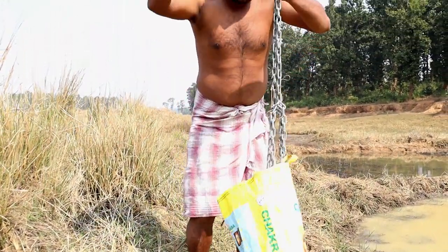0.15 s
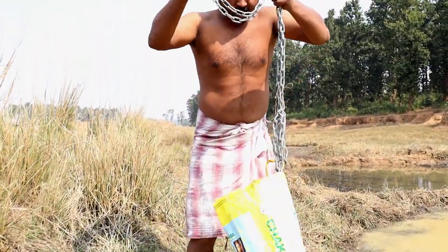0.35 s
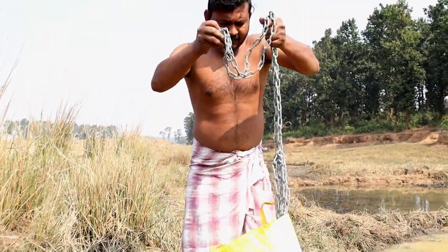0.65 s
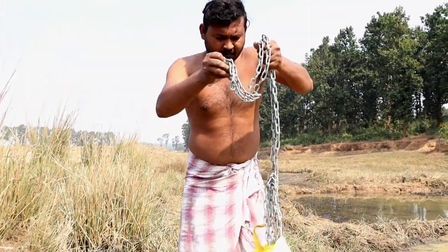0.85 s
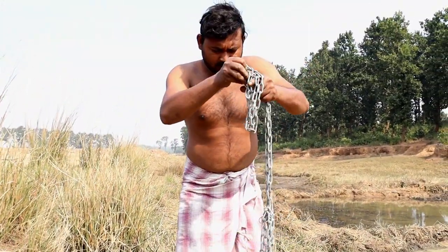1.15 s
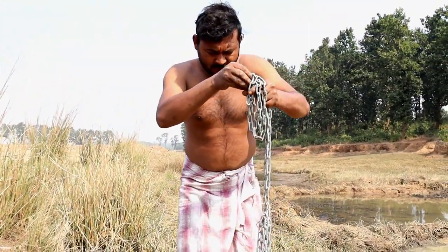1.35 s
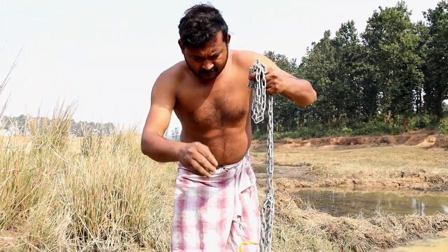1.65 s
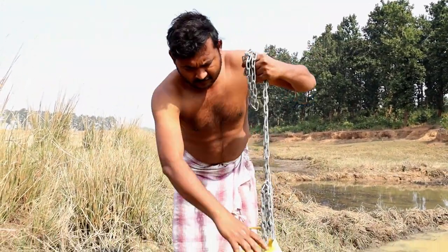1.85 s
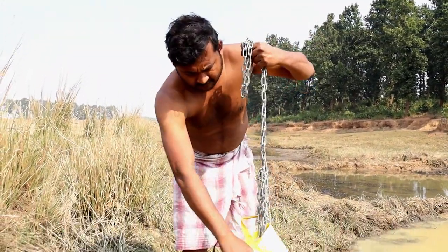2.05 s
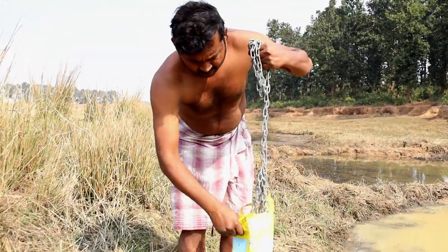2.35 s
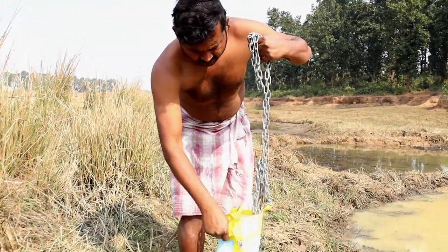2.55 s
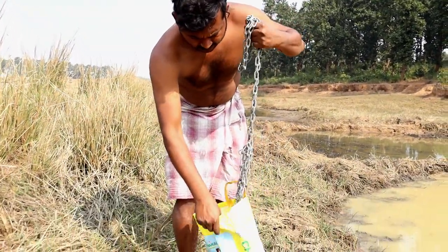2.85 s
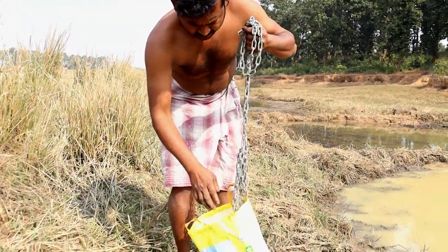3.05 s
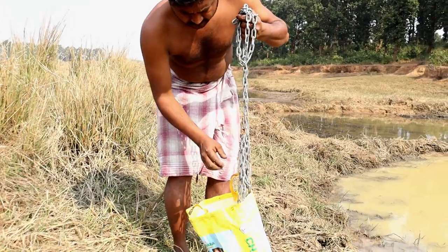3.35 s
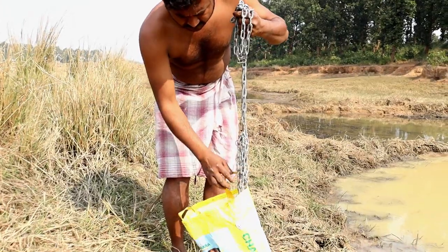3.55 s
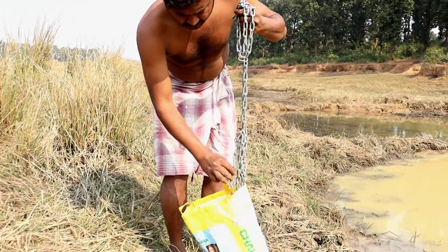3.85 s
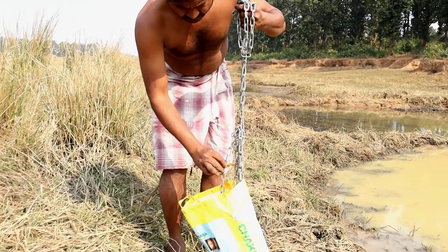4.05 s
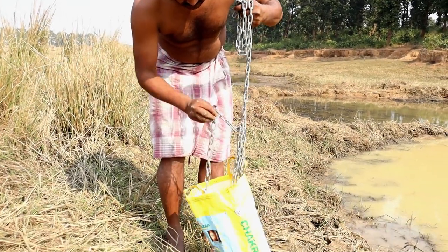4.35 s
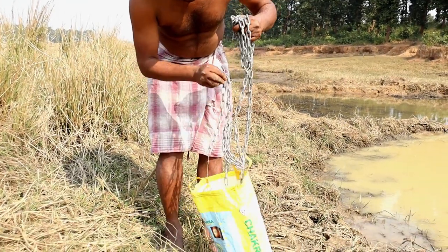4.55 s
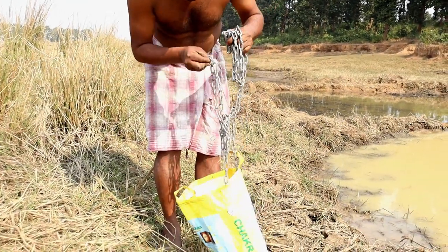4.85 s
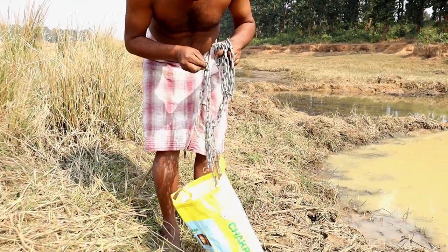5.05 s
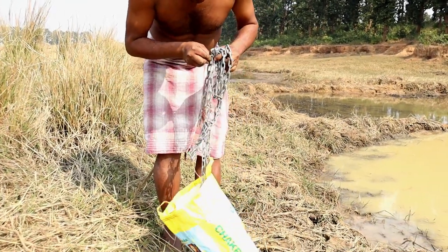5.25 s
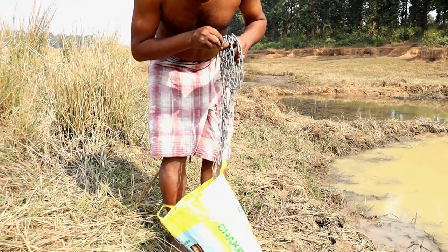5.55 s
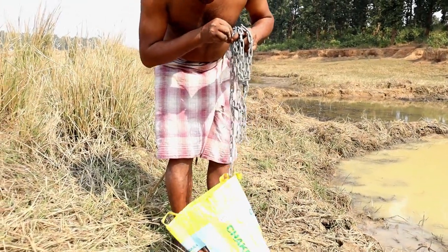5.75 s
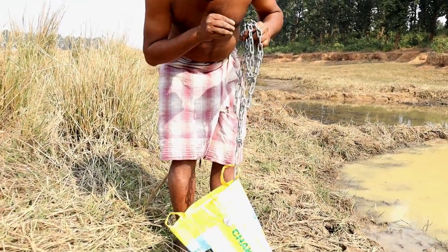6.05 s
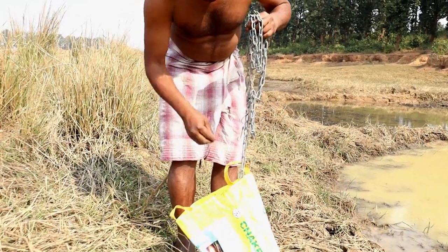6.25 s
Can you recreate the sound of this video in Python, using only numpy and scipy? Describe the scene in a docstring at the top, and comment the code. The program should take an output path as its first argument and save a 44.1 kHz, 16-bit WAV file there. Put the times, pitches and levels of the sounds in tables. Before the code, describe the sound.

A steel chain clinks and rings very high while a stiff woven plastic sack crackles and crumples, with faint low wind buffets outdoors.

```python
"""Beside a pond, a hand-gathered steel chain ticks and rings very high as a woven plastic sack snaps below it.
First come sharp creases, then clashing links; near 1.5 s the chain hisses through the fist amid low wind buffets.
The sack crumples hardest from 2 to 2.8 s, links clash densely from 4.6 to 5.7 s, and creases close the scene.
Links are struck decaying modes, creases and ticks are noise bursts, and wind is shaped low noise.
The left microphone is bright; the right hears chain, sack and air muffled and a moment later."""
import sys
import numpy as np
from scipy import signal
from scipy.fft import rfft, irfft, next_fast_len
from scipy.io import wavfile
from scipy.ndimage import uniform_filter1d

SR = 44100
rng = np.random.default_rng(int(sys.argv[2]) if len(sys.argv) > 2 else 0)


def transcribe(u):
    """Save the signal u as a 16-bit wav file named by the first command-line argument.

    u: samples, shape (n,) or (channels, n), limited to [-1, 1]; the rate is SR.
    q: integer samples, one column per channel.
    """
    v = np.clip(np.atleast_2d(u).T, -1, 1)
    q = np.round(v * 32767).astype(np.int16)
    wavfile.write(sys.argv[1], SR, q)


N = 282229
TIME = np.arange(N) / SR

# gusts swelling and fading at the microphones: middle_s, half_length_s, left_relative_db, right_relative_db
GUSTS = [(0.144, 0.13, -46, -47), (0.683, 0.14, -42, -46), (1.507, 0.32, -41.5, -36.5),
         (2.26, 0.53, -41.5, -34.5), (4.05, 0.49, -47, -38), (4.628, 0.096, -32.5, -49.5),
         (5.387, 0.096, -35.5, -46), (5.614, 0.057, -37.5, -49)]
# steady breeze under the gusts, left then right microphone: relative_db
BREEZE_DB = [-50.5, -46.5]
# spectrum of the wind's rumble: frequency_hz, gain_db
RUMBLE_SPECTRUM = [(20, -23.5), (50, -2), (120, 1), (310, -10), (550, -23), (1500, -48)]
# low buffets on the left microphone: start_s, swell_peak_db, nominal_hz
BUFFETS = [(.378, -20.5, 121), (.783, -23, 119), (1.487, -15.5, 220), (1.499, -11.5, 138.7),
           (1.528, -15.5, 166), (1.962, -6, 175), (2.855, -22, 109.5), (3.904, -10, 163),
           (5.215, -15.5, 77), (5.24, -13, 136)]
# dull handling bumps on the right microphone: start_s, relative_peak_db, resonance_hz
BUMPS = [(0.782, -37, 456), (3.091, -29.5, 380), (6.226, -36, 350), (6.349, -30, 420)]
# spectrum of the open-air hush: frequency_hz, gain_db
AIR_SPECTRUM = [(100, -2), (1300, 5.5), (3500, -4), (16000, -20)]
# the sack is tugged or squeezed, then relaxes: start_s, length_s, relative_db, settling_db_per_s
SQUEEZES = [(.04, 0.076, -42, 196), (.13, 0.14, -36.5, 227), (.94, 0.32, -51.5, 39.5),
            (2.07, 0.032, -37.5, 45), (2.34, .4, -37.5, 50), (3.1, 1.24, -57.5, 100), (4.43, 0.2, -49, 43),
            (5.36, 0.57, -47.5, 102), (5.74, 0.073, -35.5, 120.5), (5.895, 0.02, -29.5, 620),
            (6.35, 0.014, -44.5, 398.5)]
# the loudest creases snapping through: start_s, relative_peak_db, resonance_hz
SNAPS = [(0.037, -27.5, 1180), (0.058, -25, 346), (0.126, -22, 1130), (0.161, -20.5, 1310),
         (0.204, -21.5, 690), (0.216, -22.5, 710), (0.254, -19, 1140), (0.274, -24, 394),
         (0.68, -37.5, 1090), (0.941, -31, 620), (1.212, -33.5, 750), (1.278, -33, 1080),
         (2.05, -27.5, 700), (2.113, -23.5, 635), (2.139, -18, 1252), (2.211, -23.5, 1820),
         (2.305, -22, 635), (2.331, -20.5, 2200), (2.359, -23.5, 1180), (2.541, -13.5, 1080),
         (2.55, -15.5, 1210), (2.56, -16.5, 590), (2.656, -18, 1180), (2.723, -22.5, 1120),
         (2.745, -21, 1245), (3.079, -30.5, 680), (3.817, -36.5, 1226), (4.081, -37, 1270),
         (4.331, -35.5, 1300), (4.811, -33, 1207), (5.604, -34, 2270), (5.766, -24, 2730),
         (5.833, -24, 720), (5.886, -20.5, 1038), (5.905, -17.5, 660), (5.97, -32, 1020),
         (6.078, -37, 2180), (6.368, -31, 1589)]
# response of the sack's sheet: frequency_hz, gain_db
SHEET_SPECTRUM = [(60, -9.5), (200, 3), (370, 4), (540, -2), (1130, 2), (1500, -1.5), (2700, -7.5),
                  (3100, -11), (4800, -11.5), (7500, -21), (16000, -20.5)]
# the hands move the chain, then it swings out: start_s, length_s, relative_db, settling_db_per_s
PULLS = [(0.02, 0.073, -27, 331), (.175, .095, -28, 220), (.455, 0.036, -45.5, 550),
         (.63, 0.067, -37.5, 111), (.76, 0.17, -38, 100), (.928, 0.042, -29.5, 52),
         (2.045, 0.065, -42.5, 152), (2.26, 0.073, -38, 100), (2.34, 0.49, -34.5, 54.5),
         (3.485, 0.032, -42.5, 126), (3.63, 0.033, -37.5, 371), (3.805, 0.16, -43.5, 173),
         (4.43, 0.06, -46, 96), (4.5, 0.17, -30.5, 201), (4.745, 0.3, -34, 197), (5.18, 0.064, -32, 90),
         (5.365, 0.1, -25.5, 174), (5.565, .185, -33.5, 100), (5.77, .16, -30, 186.5),
         (6.245, 0.026, -49, 404.5)]
# the loudest clashes of links: start_s, ring_relative_db, crack_relative_db
CLINKS = [(0.6667, -21, -52), (0.7234, -28, -42.5), (1.0144, -24, -33.5), (1.1392, -24, -45),
          (1.2458, -38, -43), (2.5432, -18, -35), (2.656, -37, -29), (3.017, -41.5, -42),
          (3.0255, -27, -42), (3.053, -29, -42.5), (3.2134, -38, -40), (3.2416, -35, -36),
          (3.4963, -24, -33), (3.5158, -16.5, -31.5), (3.8189, -30, -42), (4.6415, -19, -35.5),
          (4.7375, -20, -41), (4.751, -19, -36.5), (4.756, -15, -48.5), (4.8185, -23, -39.5),
          (4.9395, -27, -53), (5.0405, -22, -42), (5.056, -20, -45), (5.1858, -25.5, -47),
          (5.359, -28.5, -33), (5.4666, -24, -34.5), (5.563, -27.5, -44), (5.7105, -18, -40)]
# typical modes of one link: ratio_to_pitch, level_db, t60_s
LINK_MODES = [(.425, -26, .06), (.712, -17, .06), (.86, -24, .06), (1, 0, .06), (1.003, -19, .2),
              (1.018, -6, .035), (1.105, -10, .03)]
# nominal pitches of the links: pitch_hz
LINK_HZ = [13100, 13400, 13650, 13780, 13860, 14080]
# spectrum of steel striking steel: frequency_hz, gain_db
TICK_SPECTRUM = [(300, -1), (1100, 1), (3000, -7), (5000, -3), (10000, -0.5), (12000, -3), (14000, 5),
                 (16000, -8.5)]
# muffling of the right microphone: frequency_hz, gain_db
RIGHT_MIC = [(500, 1.5), (950, -9.5), (1650, -16.5), (2200, -9), (4300, -17), (6000, -31), (14000, -47)]

AIR_DB, RIGHT_AIR_DB = -54.5, -58.0
SQUEEZE_RISE_DB_PER_S, SACK_REST_DB = 370, -62   # how fast it buckles; its faint rustle while it dangles
PULL_RISE_DB_PER_S, HANGING_DB = 735, -73   # how fast the links get going; their state when just hanging
CRACK_LOW_HZ = 1760   # the hardest clashes are too brief to carry much below this
GROUND_ECHO_S, GROUND_ECHO_DB = 0.001784, -11.5
RIGHT_LAG_S = .00036
CUTOFF_HZ = 15850


def from_db(db):
    """Decibel law: amplitude gain is ten to the power db / 20."""
    return 10 ** (np.asarray(db) / 20)


def rms_one(x):
    """Normalisation: scale to unit root-mean-square level."""
    return x / np.sqrt(np.mean(x ** 2) + 1e-20)


def add(track, s, sound):
    """Superposition: mix a short sound in at time s."""
    at = int(np.clip(s * SR, 0, N - 1))
    track[at:at + len(sound)] += sound[:N - at]


def delayed(x, s):
    """Propagation delay: the same sound arrives s seconds later."""
    return np.interp(TIME - s, TIME, x)


def drift(rate):
    """Slow random modulation: joined random values, rate per second, with unit rms."""
    return rms_one(np.interp(TIME * rate, np.arange(4096), rng.standard_normal(4096)))


def high_pass(x, hz):
    """First-order high-pass filtering: weaken what lies below hz."""
    return signal.sosfilt(signal.butter(1, hz, "high", fs=SR, output="sos"), x)


def spectrum_gain(spectrum):
    """Frequency response: interpolate decibels along log frequency; return FFT size and gains."""
    size = 2 * next_fast_len(N // 2 + 4096)
    hz, db = np.transpose(spectrum)
    bins = np.maximum(np.arange(size // 2 + 1) * SR / size, 1)
    return size, from_db(np.interp(np.log(bins), np.log(hz), db))


def colour(x, spectrum):
    """Minimum-phase filtering: a folded cepstrum gives the spectrum a causal response."""
    size, gain = spectrum_gain(spectrum)
    cepstrum = irfft(np.log(gain))
    cepstrum[1:size // 2] *= 2
    cepstrum[size // 2 + 1:] = 0
    return irfft(rfft(x, size) * np.exp(rfft(cepstrum)))[:N]


def muffled(x, spectrum):
    """Zero-phase filtering: weaken or lift each frequency without delaying it."""
    size, gain = spectrum_gain(spectrum)
    return irfft(rfft(x, size) * gain)[:N]


def ring(clicks, hz, t60):
    """Damped resonance: a unit click starts a decaying sine of nominal height 1."""
    radius = from_db(-60 / (t60 * SR))
    angle = 2 * np.pi * hz / SR
    feedback = [1, -2 * radius * np.cos(angle), radius * radius]
    return signal.lfilter([0, np.sin(angle)], feedback, clicks + 1e-18)


def dying_noise(t60, size=2048):
    """Exponential decay: a dying noise burst with unit energy."""
    burst = rng.standard_normal(size) * from_db(-60 * TIME[:size] / t60)
    return burst / np.linalg.norm(burst)


def contacts(per_s, spread_db):
    """Random impacts: clicks at chance times, many weak and a few strong, of either sign."""
    strength_db = spread_db * np.minimum(rng.exponential(1, N), 3.5)
    sizes = from_db(strength_db) * rng.choice([-1, 1], N)
    return sizes * (rng.random(N) < per_s / SR)


def evened(x, span):
    """Level equalisation: even out power over span seconds, keeping the finer grain."""
    power = uniform_filter1d(x ** 2, max(int(span * SR), 1))
    floor = 0.0034 * np.mean(x ** 2)   # keeps the quietest parts from being lifted fully
    return x / np.sqrt(np.maximum(power, 0) + floor)


def movement(rows, rise_db_per_s, rest_db):
    """Addition of powers: movements rise, hold and settle over a resting level, in dB."""
    power = from_db(rest_db) ** 2
    for start_s, length_s, level_db, settling_db_per_s in rows:
        early = np.maximum(start_s - TIME, 0)
        late = np.maximum(TIME - start_s - length_s, 0)
        drop_db = np.minimum(rise_db_per_s * early + settling_db_per_s * late, 120)
        power = power + from_db(level_db - drop_db) ** 2
    return 10 * np.log10(power)


def crackle(clicks, t60, low_lingers, patchy_db):
    """Frequency-dependent damping: clicks feed decaying noise bands; t60 holds at 1 kHz, lows last longer."""
    out = np.zeros(N)
    edges = np.geomspace(90, 17000, 12)
    at = np.flatnonzero(clicks)
    for low, high in zip(edges, edges[1:]):
        # each click draws its own level in each band, hence its own colour
        patch = np.clip(rng.standard_normal(len(at)), -2, 1)
        energy = np.zeros(N)
        energy[at] = (clicks[at] * from_db(patchy_db * patch)) ** 2
        band_t60 = t60 * (np.sqrt(low * high) / 1000) ** -low_lingers
        keep = from_db(-120 / (SR * band_t60))   # energy falls as amplitude squared
        stored = signal.lfilter([1 - keep], [1, -keep], energy + 1e-18)
        noise = np.sqrt(stored) * rng.standard_normal(N)
        out += signal.sosfilt(signal.butter(2, [low, high], "band", fs=SR, output="sos"), noise)
    return out


def knocks(rows, level_db, t60, width_hz):
    """Broad resonance: a dying scuff excites each short dull knock."""
    out = np.zeros(N)
    for start_s, peak_db, resonance_hz in rows:
        knock = ring(dying_noise(t60), resonance_hz, 2.2 / width_hz)   # bandwidth to decay time
        add(out, start_s, from_db(peak_db + level_db) * knock / np.abs(knock).max())
    return out


def air_hush(level_db):
    """Stationary broadband noise: an open-air hush."""
    return from_db(level_db) * rms_one(colour(rng.standard_normal(N), AIR_SPECTRUM))


def wind(level_db, lumpy_db):
    """Turbulence: gust and breeze powers add, with independent eddies at each microphone."""
    power = from_db(BREEZE_DB)[:, None] ** 2
    for middle_s, half_length_s, left_db, right_db in GUSTS:
        swell = np.exp(-((TIME - middle_s) / half_length_s) ** 2)
        power = power + from_db([[left_db], [right_db]]) ** 2 * swell
    microphones = []
    for mic_power in power:
        eddies = from_db(level_db + lumpy_db * np.tanh(drift(30)))
        rumble = rms_one(colour(rng.standard_normal(N), RUMBLE_SPECTRUM))
        microphones.append(np.sqrt(mic_power) * eddies * rumble)
    return np.array(microphones)


def buffets(cycles, sag, size=4000):
    """Damped oscillation: each push on the microphone swings to and fro, slowing as it dies."""
    out = np.zeros(N)
    for start_s, peak_db, nominal_hz in BUFFETS:
        turns = TIME[:size] * nominal_hz
        swell = turns / cycles * np.exp(1 - turns / cycles)
        swing = np.sin(2 * np.pi * 1.45 * np.log1p(sag * turns) / sag)   # starts at 1.45 times nominal_hz
        add(out, start_s, from_db(peak_db) * swell * swing)
    return out


def sack(crinkle_db, snap_db, per_s, spread_db):
    """Buckling: the stiff sheet releases countless small creases and a few loud snaps."""
    crumple_db = movement(SQUEEZES, SQUEEZE_RISE_DB_PER_S, SACK_REST_DB)
    crease_rate = per_s * from_db(.3 * (crumple_db + 36.5))
    creases = evened(contacts(crease_rate, spread_db), span=0.076)
    creases = from_db(crumple_db + crinkle_db) * creases
    snaps = np.zeros(N)
    for start_s, peak_db, _ in SNAPS:
        add(snaps, start_s, from_db([peak_db + snap_db]))
    # a small crease has a colour of its own; a big snap shakes the whole sheet and rings briefly at its own
    # pitch
    crinkle = crackle(creases, t60=.052, low_lingers=.25, patchy_db=4.5)
    snapping = crackle(snaps, t60=.045, low_lingers=.35, patchy_db=2)
    sheet = colour(crinkle + snapping, SHEET_SPECTRUM)
    return sheet + knocks(SNAPS, level_db=0.5, t60=.025, width_hz=160)


def slide(middle_s, half_length_s, level_db):
    """Friction noise: the chain slips through the fist with a short soft hiss."""
    swell = np.exp(-((TIME - middle_s) / half_length_s) ** 2)
    return from_db(level_db) * swell * rms_one(colour(rng.standard_normal(N), TICK_SPECTRUM))


def slack(depth, length_s, size=4000):
    """Free fall: just before a clash the links hardly touch, so the jostling weakens."""
    falling = np.zeros(N)
    for start_s, *_ in CLINKS:
        add(falling, start_s - size / SR, np.exp(-TIME[:size][::-1] / length_s))
    return 1 - depth * np.minimum(falling, 1)


def link(clicks, hz):
    """Modal superposition: a link rings in all its modes, and no two are bent quite alike."""
    out = 0
    for ratio, level_db, t60_s in LINK_MODES:
        gain = from_db(level_db + rng.normal(0, 1))
        mode_hz = hz * ratio * (1 + (ratio - 1) * rng.normal(0, .06))
        out = out + gain * ring(clicks, mode_hz, t60_s)
    return out


def rattle(ring_db, tick_db, tick_growth):
    """Repeated impact: harder shaking gives more contacts along the chain and freer ringing."""
    shake_db = movement(PULLS, PULL_RISE_DB_PER_S, HANGING_DB)
    effort_db = shake_db + 30
    clicks = contacts(per_s=700 * from_db(.45 * effort_db), spread_db=3.8)
    pitches = np.repeat(LINK_HZ, 2) * rng.normal(1, .005, 2 * len(LINK_HZ))
    # the same few links chatter for a moment, then others take over
    wander = 4 * drift(20) + 2 * rng.standard_normal(N)
    struck = np.round(wander).astype(int) % len(pitches)
    firm = clicks * (np.abs(clicks) > 1.2)   # only the firmer contacts set a link ringing
    rings = sum(link(firm * (struck == k), hz) for k, hz in enumerate(pitches))
    ticks = colour(crackle(clicks, t60=.036, low_lingers=.25, patchy_db=3.0), TICK_SPECTRUM)
    ringing = from_db(shake_db + ring_db) * evened(rings, span=0.047)
    ticking = from_db(tick_db + tick_growth * effort_db) * evened(ticks, span=0.28)
    return (ringing + ticking) * slack(depth=.6, length_s=.022)


def clinks(ring_db, crack_db, chatter_s, rebound_db, size=6000, count=5):
    """Impact and rebound: a link cracks on its neighbour, rebounds more softly and rings on."""
    rings, cracks = np.zeros(N), np.zeros(N)
    for start_s, clash_ring_db, clash_crack_db in CLINKS:
        blows = np.zeros(size)
        later = np.cumsum(rng.uniform(.2, 1, count)) * chatter_s
        rebounds = from_db(rebound_db * np.sqrt(np.arange(1, count + 1)))
        blows[np.minimum((later * SR).astype(int), size - 1)] = rebounds
        blows[0] = 1
        tone = link(blows, rng.choice(LINK_HZ))
        tone = tone / np.std(tone[:700])   # levelled on its onset
        add(rings, start_s, from_db(clash_ring_db + ring_db) * tone)
        add(cracks, start_s, from_db(clash_crack_db + crack_db) * blows ** 2)
    cracks = colour(crackle(cracks, t60=.016, low_lingers=.2, patchy_db=2), TICK_SPECTRUM)
    return rings + high_pass(cracks, CRACK_LOW_HZ)


def scattering(x):
    """Multipath scattering: ground and moving body scatter shorter waves along two shifting paths."""
    short_waves = high_pass(x, 2000)
    return sum(drift(10) * signal.oaconvolve(short_waves, dying_noise(t60=.05))[:N] for _ in range(2))


def scene():
    """Superposition at two receivers: shared sources reach both, wind and handling act on each alone."""
    wind_pair = wind(level_db=1.0, lumpy_db=5.0)
    bumps = knocks(BUMPS, level_db=9.5, t60=0.055, width_hz=64)
    handling = np.array([buffets(cycles=0.37, sag=0.75), bumps])
    air = air_hush(AIR_DB + 2 * drift(10))
    crumpling = sack(crinkle_db=13.5, snap_db=30, per_s=830, spread_db=4.5)
    ground_echo = from_db(GROUND_ECHO_DB) * delayed(crumpling, GROUND_ECHO_S)
    chain = slide(middle_s=1.543, half_length_s=0.11, level_db=-44.0)
    chain = chain + clinks(ring_db=-8, crack_db=30.5, chatter_s=.005, rebound_db=-4.0)
    chain = chain + rattle(ring_db=1.5, tick_db=-39.5, tick_growth=0.67)
    left = chain + air + crumpling + ground_echo
    right = delayed(muffled(left, RIGHT_MIC), RIGHT_LAG_S)
    right = right + from_db(3) * scattering(right) + air_hush(RIGHT_AIR_DB)
    return np.array([left, right]) + wind_pair + handling


def record(dry):
    """Band limiting: an elliptic low-pass filter cuts the top steeply."""
    return signal.sosfilt(signal.ellip(12, .2, 70, CUTOFF_HZ, fs=SR, output="sos"), dry)


dry = scene()
out = record(dry)
transcribe(out)
```